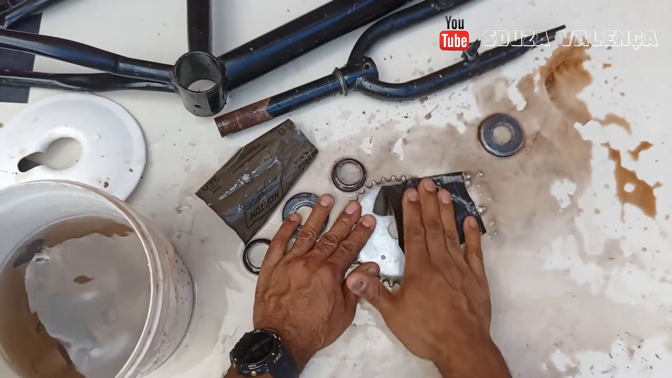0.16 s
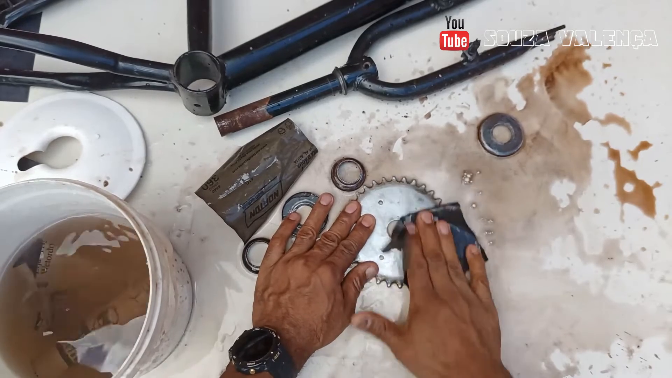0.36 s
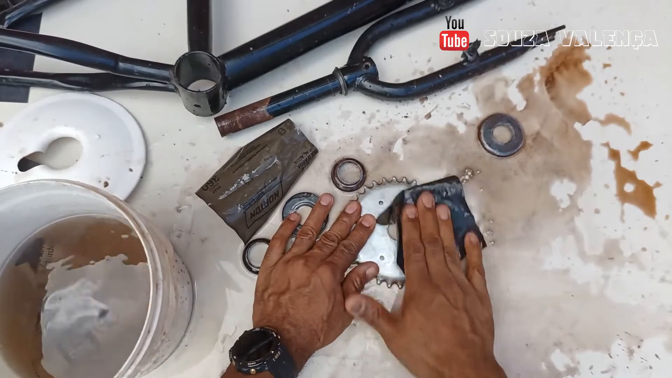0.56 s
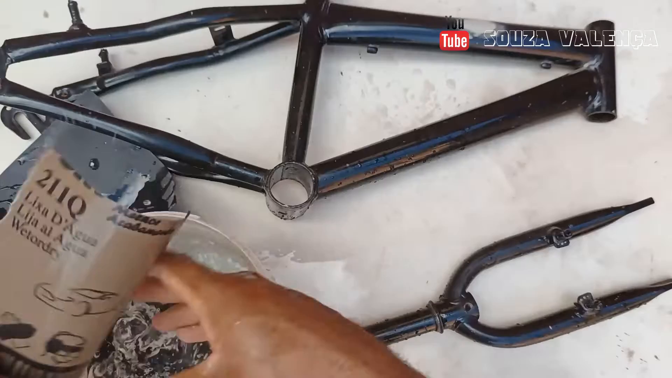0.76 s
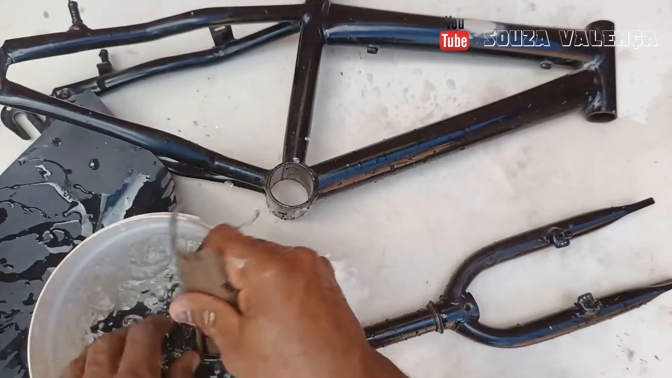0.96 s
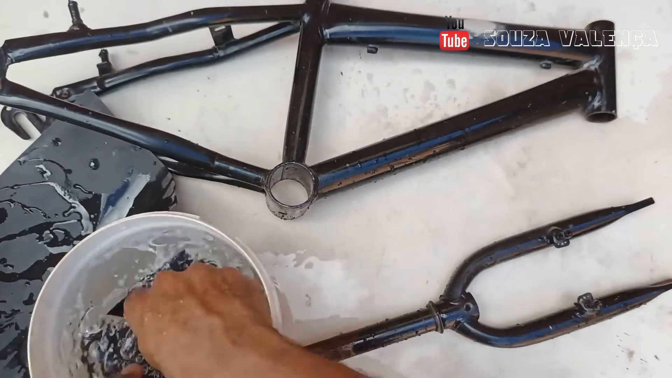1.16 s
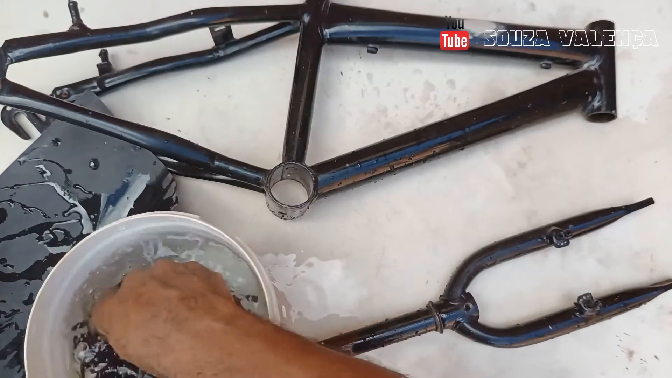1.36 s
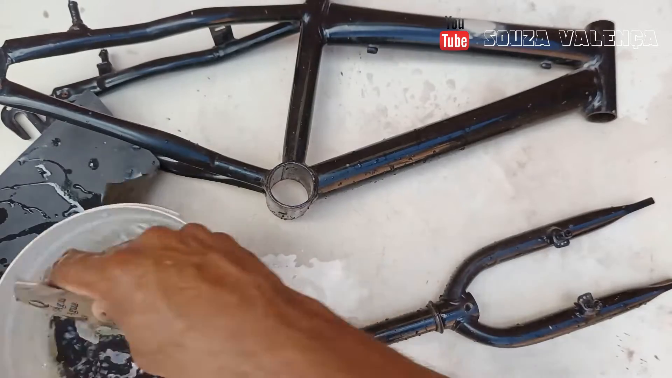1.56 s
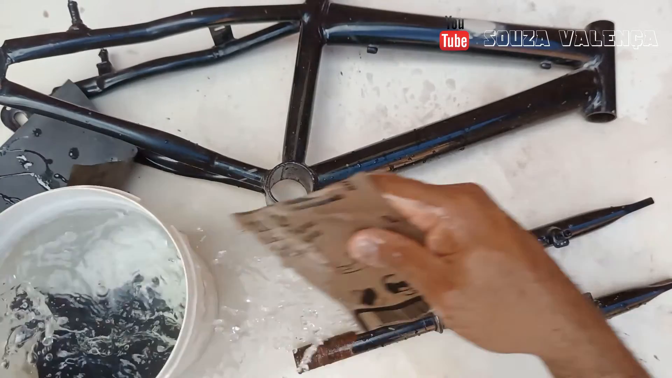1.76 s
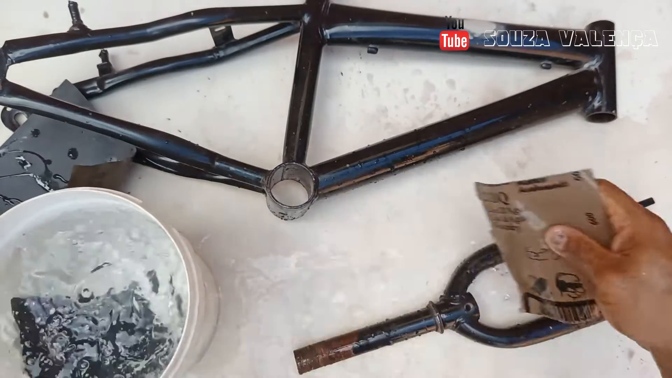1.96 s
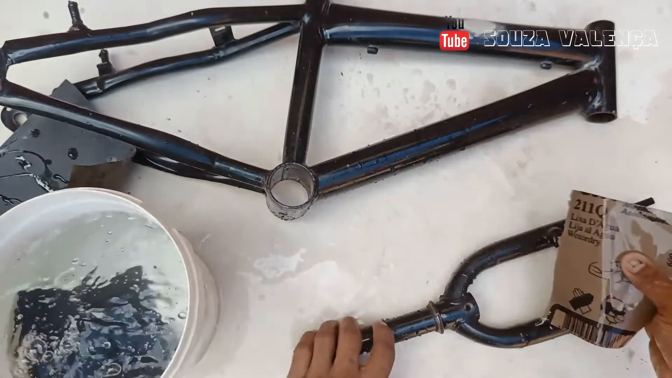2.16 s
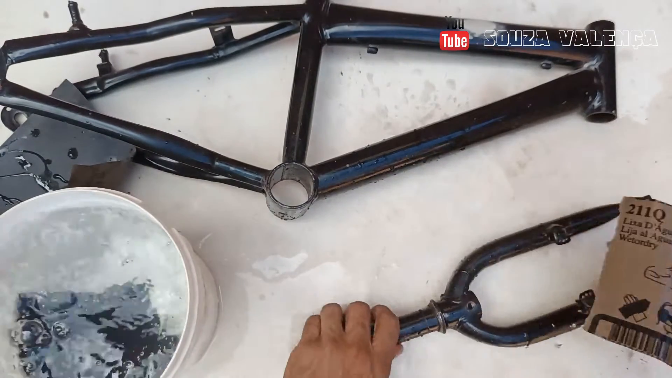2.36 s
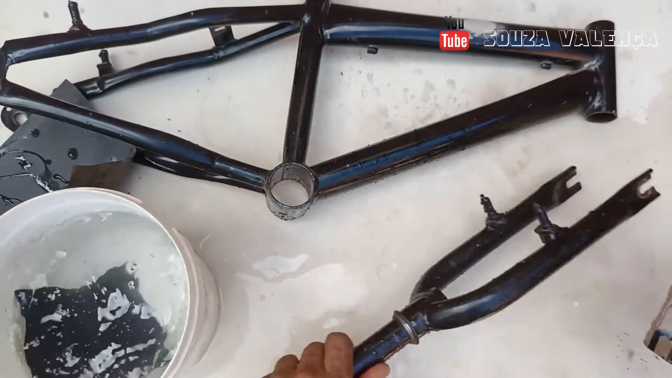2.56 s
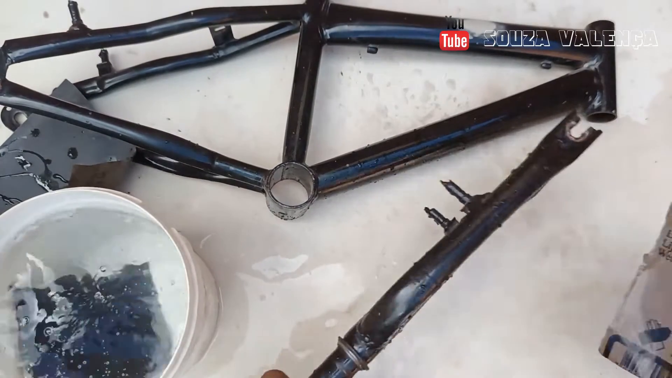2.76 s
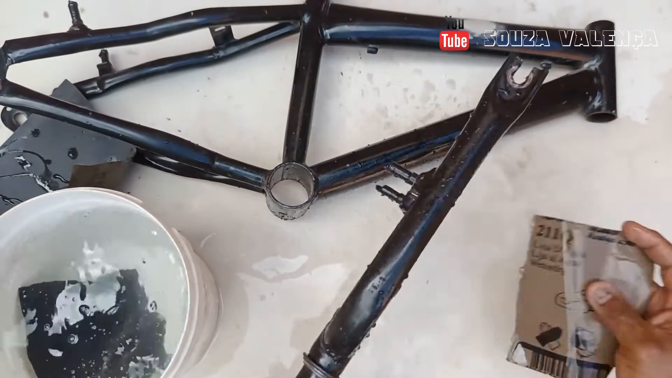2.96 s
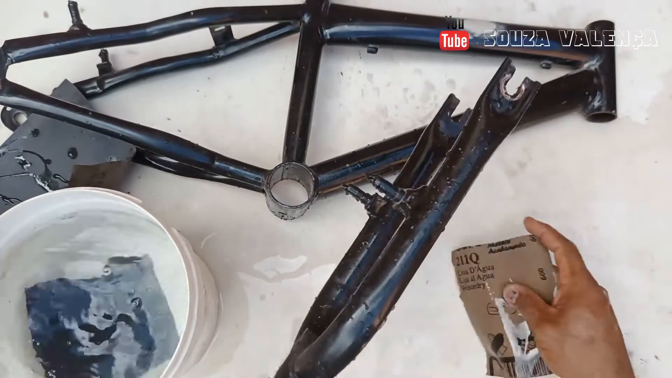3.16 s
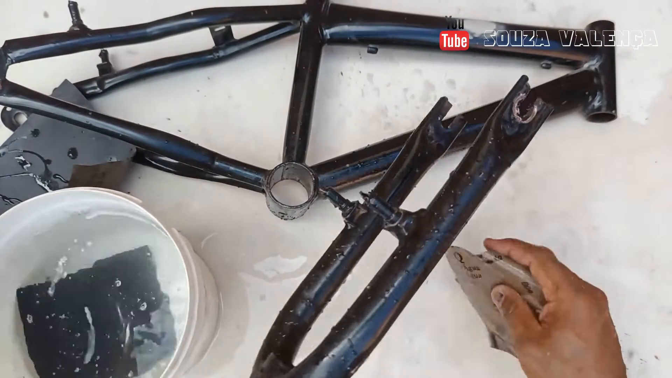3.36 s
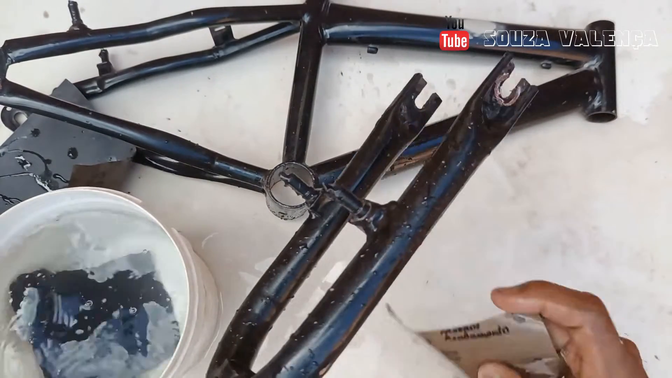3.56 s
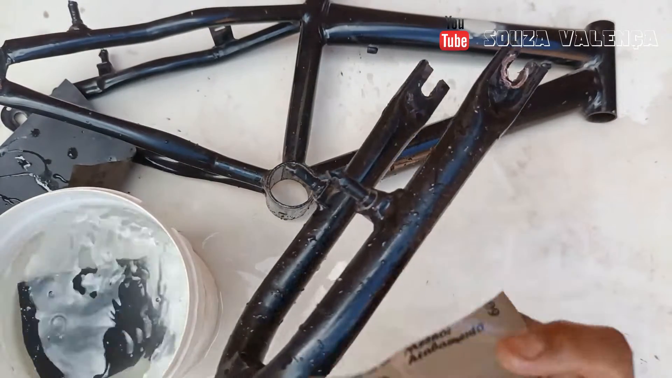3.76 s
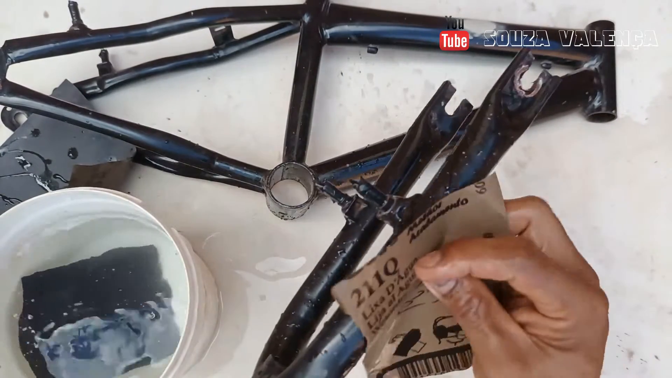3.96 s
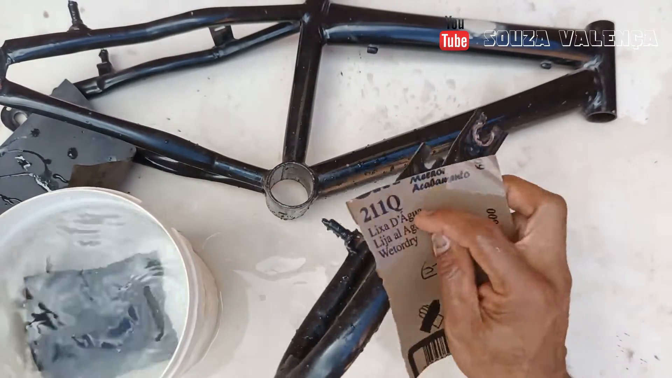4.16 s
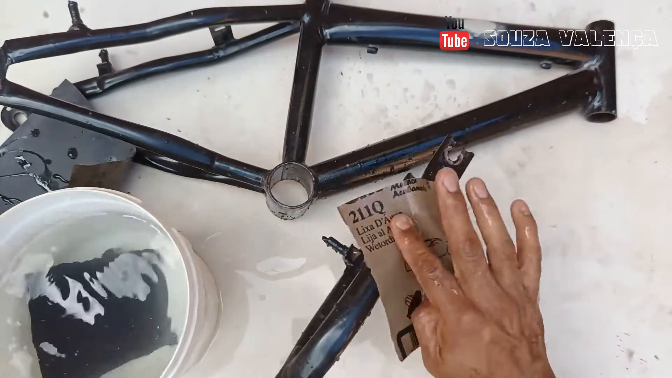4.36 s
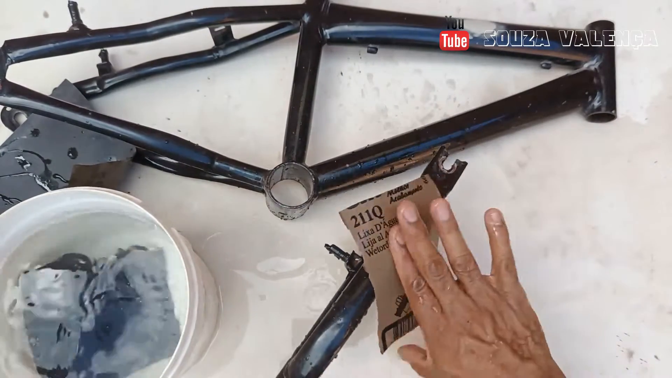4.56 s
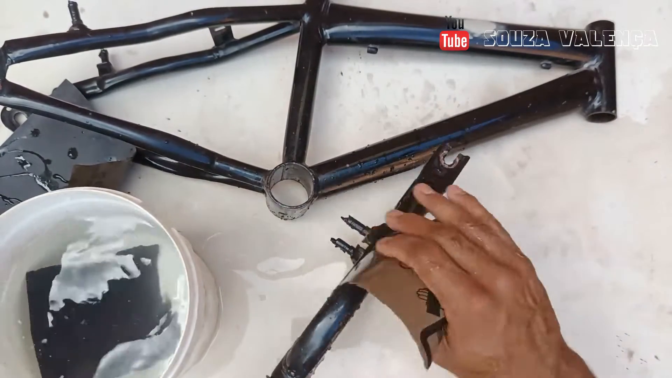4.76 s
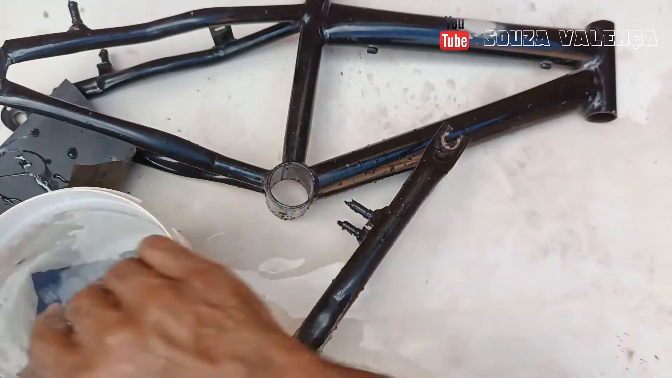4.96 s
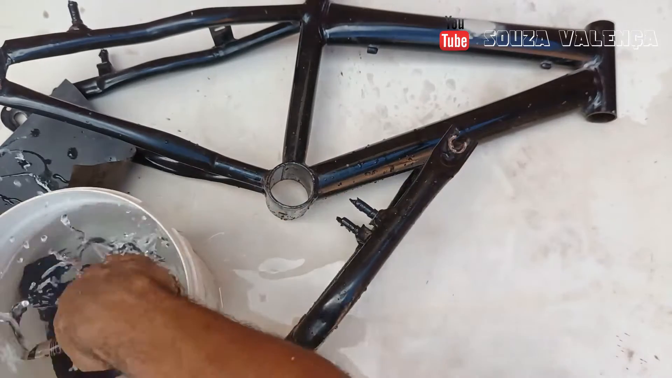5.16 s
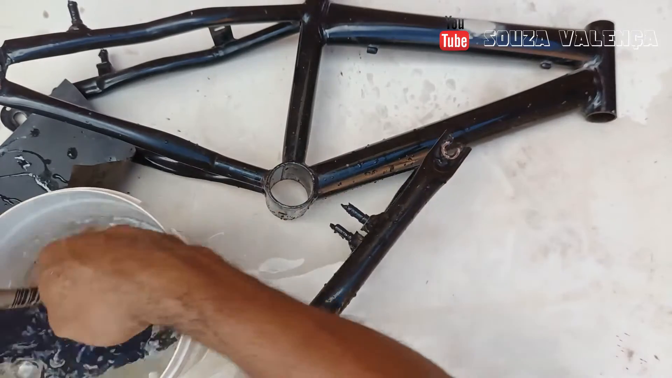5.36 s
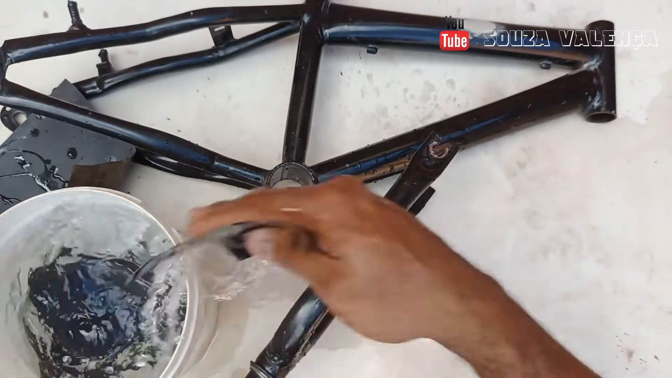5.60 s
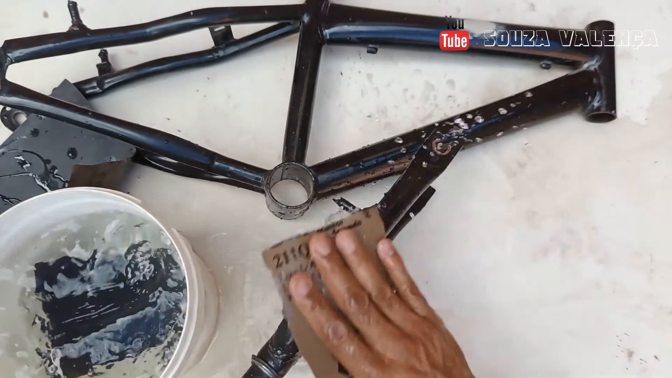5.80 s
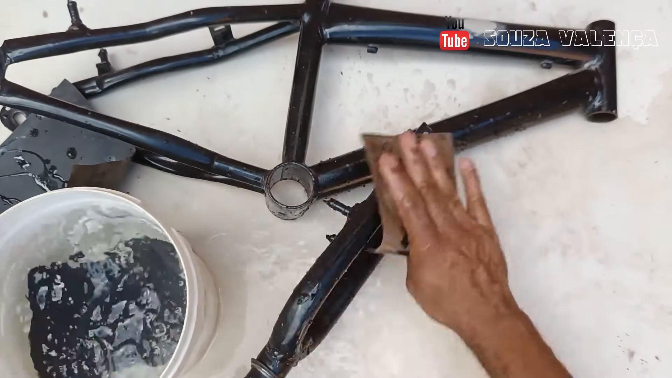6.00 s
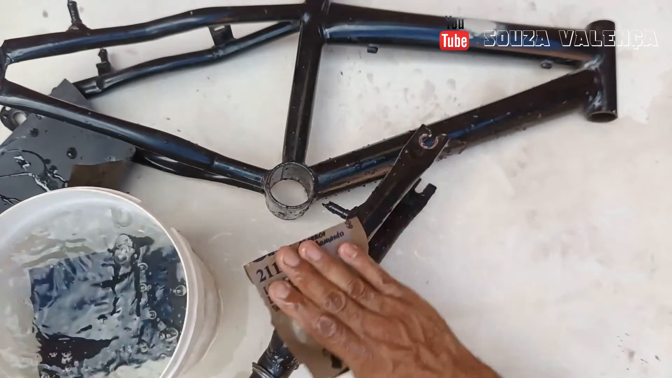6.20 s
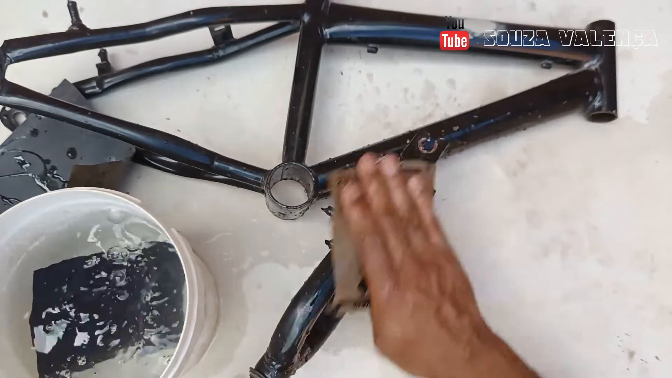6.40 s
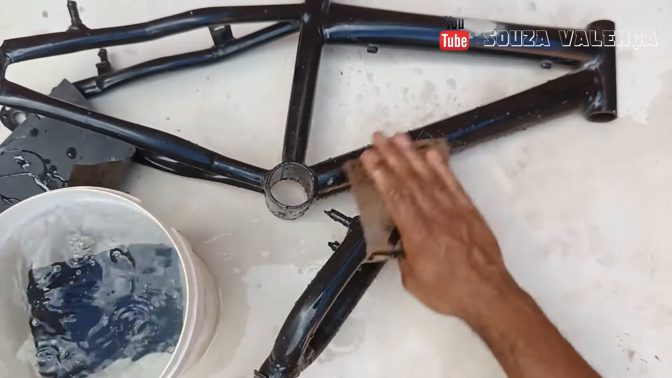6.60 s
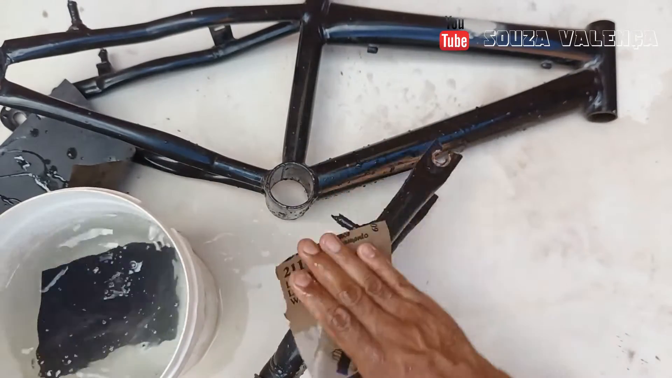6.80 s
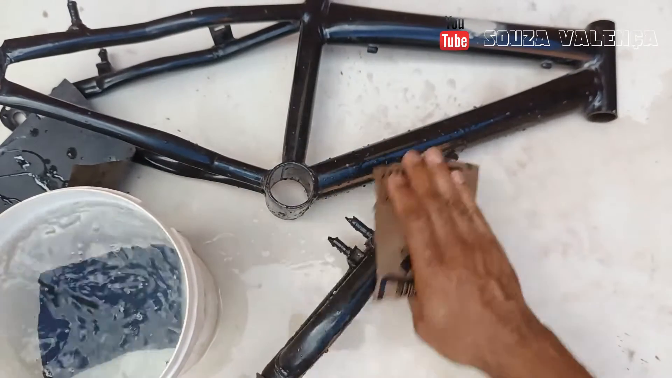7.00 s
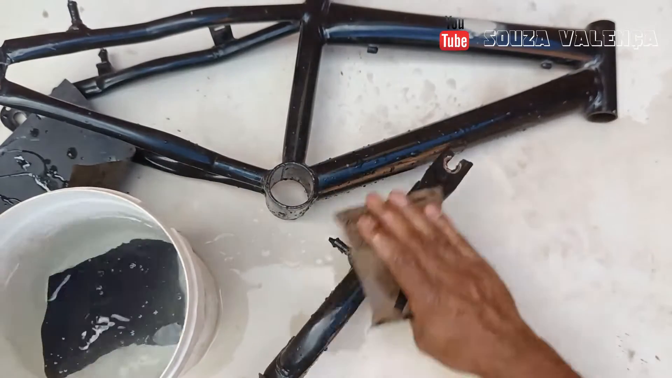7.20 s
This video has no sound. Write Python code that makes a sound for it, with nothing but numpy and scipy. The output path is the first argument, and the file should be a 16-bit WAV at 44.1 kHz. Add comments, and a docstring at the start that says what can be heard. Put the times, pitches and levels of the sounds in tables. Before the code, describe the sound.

Fast gritty rubbing on ringing steel, watery sloshing and bubbling, quiet paper handling with hollow knocks, another dip, then brisk sanding strokes.

```python
"""Wet sandpaper rubs a steel sprocket: grains of grit noise excite resonances of the steel. It is rinsed in a
bucket: swarms of small bubble tones, larger gliding bubbles, noise-burst slaps, ringing wall. Then rustling grains
and snaps as paper and a steel fork are handled, taps on its tube, modal knocks on a hollow table and far whistling
birds. A second dip follows, then strokes along the fork. Faint outdoor noise and table shakes run beneath;
a small, dull microphone is close."""
import sys
import numpy as np
from scipy import signal
from scipy.fft import rfft, irfft, next_fast_len
from scipy.io import wavfile
from scipy.ndimage import uniform_filter1d, map_coordinates

SR = 44100
rng = np.random.default_rng(int(sys.argv[2]) if len(sys.argv) > 2 else 0)


def master_out(mix):
    """Clip the mix to full scale and print it as 16-bit PCM to the path in sys.argv[1]."""
    frames = np.transpose(np.atleast_2d(mix))
    ceiling = np.clip(frames, -1, 1)
    pcm = np.round(ceiling * 32767).astype(np.int16)
    wavfile.write(sys.argv[1], SR, pcm)


N = 319284  # samples

# outdoor background: (frequency [Hz], gain [dB])
AIR_COLOUR = [(20, -7.5), (60, 9.5), (130, 10.5), (300, 5.5), (1000, -2.5), (2000, -8), (4000, -8),
              (7000, -11.5), (12000, 0.5), (16000, -5)]

# strokes of the hand: (start [s], length [s], hardest press [share of length], grit [dB],
# drag of the steel's middle modes [dB], body of the part on the table [dB], bite of the drag [dB])
SPROCKET_STROKES = [(-.1, .16, 0.56, -28.5, -37, -62, -3.5), (.054, 0.17, 0.56, -29.5, -38, -55.5, -0.5),
                    (.23, 0.18, 0.65, -28.5, -32.5, -38.5, 3), (.405, 0.16, .7, -28, -38.5, -54, -1.5),
                    (.57, 0.19, 0.74, -33, -37, -79, 13)]
FORK_STROKES = [(5.79, 0.16, 0.63, -37.5, -47.5, -49.5, 3.1), (5.94, 0.15, 0.31, -33.5, -44, -69, 2.7),
                (6.066, 0.14, 0.58, -32.5, -42.5, -54, 1), (6.185, 0.087, 0.12, -33, -52.5, -93, 0.82),
                (6.265, 0.17, 0.067, -37, -49.5, -61.5, 8.3), (6.418, 0.17, 0.086, -29, -46, -60.5, 11),
                (6.575, 0.17, 0.83, -28.5, -38, -56.5, 1.3), (6.712, 0.18, 0.32, -29.5, -46, -65.5, 1.4),
                (6.885, 0.16, .7, -27.5, -39, -60, 1), (7.02, .19, 0.5, -29.5, -46.5, -61.5, 2.3),
                (7.21, 0.072, 0.34, -50, -38.5, -47.5, 1)]
# steel resonances: (frequency [Hz], width [Hz], level [dB])
SPROCKET_MODES = [(607, 74, -6.5), (1450, 59, 5), (2090, 60, -18), (2480, 110, -12), (3120, 69, 7),
                  (3260, 68, -0.5), (3543, 110, 8.5), (4520, 150, -10.5), (5030, 160, 0), (6400, 120, -7),
                  (6030, 66, -4), (7700, 88, -6)]
FORK_MODES = [(1430, 19, 6.5), (2690, 60, -0.5), (3330, 700, 1.5)]
# colours of grit, drag and body: (frequency [Hz], gain [dB])
GRIT_COLOUR = [(3000, -45.5), (4300, 3), (5500, 10.5), (7000, 8), (9000, 8.5), (13000, 9), (15000, 3.5)]
DRAG_COLOUR = [(1100, -28), (1900, -4.5), (2500, -4), (3200, -5.5), (4000, -6.5), (5500, -23)]
BODY_COLOUR = [(180, -7), (350, 0), (700, 2.5), (1400, -2.5), (2200, -29.5)]
START_S, STOP_S, TURN_DB = 0.018, 0.032, 23.5  # speeding up, slowing down, loss at the turn
SWELL_DB = 6  # gain of the grit from half a stroke length away to the hardest press
DRAG_SWELLS, BODY_SWELLS = 0.53, 1.4  # share of the grit's swell
BITE_HALF_S = 0.03  # reach of the bite on each side of the hardest press

# pushes that shake the table: (peak [s], rise [s], fall [s], level [dB])
TABLE_SHAKES = [(.104, 0.064, .05, -52), (.354, .04, .15, -51), (.65, 0.13, 0.071, -59.5),
                (1.142, .04, 0.16, -52), (1.286, 0.052, 0.083, -52.5), (1.472, 0.042, 0.094, -48),
                (1.68, .1, 0.072, -41.5), (1.894, 0.04, 0.13, -40.5), (2.05, 0.16, 0.035, -47),
                (2.242, 0.027, 0.17, -34), (4.43, 0.019, 0.43, -57), (4.54, 0.01, 0.35, -34.5),
                (4.834, 0.38, 0.11, -40.5), (5.528, .06, 0.084, -52.5), (5.654, 0.028, 0.17, -47),
                (5.82, .05, 0.18, -34), (5.9, 0.11, 0.068, -44), (6.456, 0.2, 0.28, -60),
                (6.76, 0.074, 0.35, -59), (7.03, .03, 0.17, -49.5), (7.13, 0.13, 0.037, -53),
                (7.24, 0.043, .1, -67)]
# colour of the shaking: (frequency [Hz], gain [dB])
SHAKE_COLOUR = [(30, -32), (60, 2), (90, 4.5), (125, 6), (170, -1.5), (300, -48)]
# fork on the table: (time [s], level [dB], clack relative to the knock [dB])
KNOCKS = [(2.221, -45.5, -24), (2.248, -46, -5.5), (4.534, -12.5, -51), (4.579, -25.5, -32),
          (4.608, -18, -5), (4.744, -32, -2), (4.809, -27.5, 7), (5.782, -33.5, -1), (5.815, -26.5, -20),
          (5.839, -36.5, -11)]
# hollow table modes: (frequency [Hz], level [dB], t60 [s])
TABLE_MODES = [(127, 0, 0.3), (327, 0, 0.084), (414.7, -5.5, 0.2), (500, -3.5, 0.093), (629.4, -6, 0.12),
               (1000, -16, 0.22)]

# water stirred and poured in the bucket: (peak [s], rise [s], fall [s], fizz [dB], splash [dB], slosh [dB])
RINSING = [(.78, 0.0029, .06, -79, -46, -45), (.82, 0.019, 0.14, -43.5, -54, -67),
           (.92, .15, 0.011, -44.5, -57, -90), (1.008, 0.091, 0.054, -42, -49, -90),
           (1.09, 0.052, 0.11, -52, -49, -59), (1.115, 0.0095, .07, -62, -48, -38),
           (1.2, .1, 0.084, -57, -61.5, -65), (1.256, 0.06, 0.026, -84, -45.5, -51.5),
           (1.3, 0.027, .1, -50, -43.5, -51), (1.37, 0.0067, 0.048, -39, -72, -48.5),
           (1.424, 0.032, 0.047, -68, -47.5, -43.5), (1.646, 0.13, 0.16, -48, -45, -41),
           (1.724, 0.166, 0.29, -42.5, -48.5, -52), (1.802, 0.146, 0.16, -47, -47.5, -44.5),
           (1.875, 0.037, 0.068, -75, -55, -49), (2.03, .3, 0.085, -63.5, -82.5, -59.5),
           (5.18, 0.025, 0.078, -41, -52, -84), (5.277, .01, 0.03, -52, -45, -31),
           (5.3, 0.0027, 0.054, -34, -38.5, -29), (5.44, 0.23, 0.22, -82, -71, -63.5),
           (5.54, .15, 0.057, -58.5, -71, -90), (5.636, 0.028, .035, -38, -48.5, -63),
           (5.775, 0.16, 0.011, -52.5, -67, -53)]
# colour of the fizz: (frequency [Hz], gain [dB])
FIZZ_COLOUR = [(3000, -41.5), (4300, -5.5), (5500, 10.5), (7000, -7.5), (10000, 4), (15000, 5)]
# air and wall of the bucket: (frequency [Hz], width [Hz], level [dB])
BUCKET_MODES = [(345, 36, -8), (626, 78, -10.5), (807, 18, 2), (3340, 25, -1.5), (4900, 22, -2)]
# large bubbles and drops: (time [s], level [dB], pitch [Hz], t60 [s])
DROPS = [(0.809, -40, 860, 0.058), (0.847, -27.5, 1434, 0.033), (0.893, -41.5, 1670, 0.039),
         (0.913, -27.5, 3580, 0.03), (1.011, -49, 3520, 0.065), (1.114, -21, 705, 0.035),
         (1.185, -40.5, 1620, 0.059), (1.258, -40, 1000, 0.073), (1.41, -27.5, 1336, 0.044),
         (1.637, -23.5, 602, 0.038), (1.754, -25.5, 1000, 0.037), (1.792, -33, 830, 0.14),
         (1.884, -39, 345, 0.15), (1.668, -30, 550, .04), (1.925, -41, 448, 0.1), (2.0, -40.5, 553, .06),
         (2.035, -42.5, 412, 0.082), (1.2, -43.5, 1270, 0.052), (1.285, -38, 1030, 0.049),
         (1.505, -49, 1383, 0.068), (1.53, -42.5, 1495, .05), (5.251, -36, 838, 0.07),
         (5.277, -23.5, 440, 0.026), (5.298, -20, 840, 0.041), (5.332, -42, 793, 0.049),
         (5.438, -46, 1444, 0.07), (5.716, -32, 680, 0.048)]
# deep pockets of air: (time [s], level [dB], pitch [Hz], t60 [s])
GULPS = [(.775, -28.5, 584, 0.087), (1.96, -42, 478, 0.079)]
# knocks on the bucket wall: (time [s], level [dB], pitch [Hz], t60 [s])
BUCKET_RINGS = [(.86, -62, 692, 0.56), (1.116, -48, 750, 0.25), (1.41, -54, 1380, 1),
                (5.186, -42.5, 850, 0.16), (5.3, -54, 814, 0.77), (5.545, -59, 830, 0.22)]
# fine droplets flying off the paper: (peak [s], rise [s], fall [s], level [dB])
SPRAY = [(1.28, 0.0049, .05, -25.5), (1.885, .003, 0.022, -45), (1.925, 0.0034, .02, -48),
         (1.953, .003, .03, -42.5), (1.984, .003, .05, -45)]
# colour of the spray: (frequency [Hz], gain [dB])
MIST_COLOUR = [(7000, -18), (8800, 8), (12500, -9), (14000, -17), (16000, -16)]
FADE_DB = 25  # gain over a surge's rise time, loss over its fall time

# short bursts: (time [s], level [dB], centre [Hz], t60 [s])
WATER_SLAPS = [(0.7741, -30.5, 2570, 0.045), (0.8566, -28, 5100, 0.035), (0.9084, -31.5, 3780, 0.038),
               (1.014, -21, 4050, 0.034), (1.064, -35, 5560, 0.11), (1.1128, -31, 1900, 0.031),
               (1.257, -25.5, 1700, 0.02), (1.271, -15.5, 2360, 0.018), (1.284, -16.5, 5100, 0.026),
               (1.2936, -19.5, 3480, 0.014), (1.312, -19, 2740, 0.046), (1.3678, -24.5, 3900, 0.062),
               (1.402, -33, 2600, 0.04), (1.4094, -23, 5130, 0.05), (1.423, -25, 4000, 0.023),
               (1.437, -29, 3030, 0.034), (1.6207, -29, 3400, 0.037), (1.7345, -27.5, 5820, 0.053),
               (1.7918, -24, 5100, 0.087), (1.953, -33.5, 2800, 0.031), (1.9824, -33.5, 6550, 0.041),
               (2.0637, -36.5, 4820, 0.08), (5.1512, -40.5, 4093, 0.078), (5.1718, -27.5, 5570, 0.034),
               (5.1991, -26, 3670, 0.058), (5.2994, -21.5, 3400, 0.026), (5.333, -27.5, 1600, 0.026),
               (5.4584, -37, 2130, 0.1), (5.5449, -29, 2520, 0.046), (5.6301, -30.5, 2760, 0.082),
               (5.693, -40, 2290, 0.07), (5.716, -28.5, 1530, 0.054)]
PAPER_SNAPS = [(3.186, -42.5, 1760, 0.035), (3.215, -43.5, 4600, 0.08), (3.277, -39, 1200, 0.021),
               (3.294, -27, 3750, 0.034), (3.301, -30, 2410, 0.03), (3.3927, -48.5, 6560, 0.088),
               (3.7314, -50.5, 4960, 0.1), (3.8322, -35.5, 2370, 0.04), (3.8736, -37.5, 2800, 0.075),
               (3.9937, -19.5, 3150, 0.023), (4.3276, -35.5, 2360, 0.087), (4.535, -23, 3400, 0.029),
               (4.7181, -19.5, 6100, 0.023), (4.8404, -28.5, 5100, 0.038), (5.007, -43.5, 3800, 0.1)]
GRIT_CATCHES = [(5.8122, -14, 3660, 0.0097), (5.8434, -17, 2900, 0.069), (6.0716, -12.5, 6570, 0.028),
                (6.121, -20, 5040, 0.046), (6.391, -20, 1400, 0.024), (6.4232, -18, 3200, 0.09),
                (6.764, -30, 3400, 0.018), (6.8044, -28, 5300, 0.079), (6.9022, -12.5, 2720, 0.038),
                (7.222, -20, 2420, 0.035)]
WATER_TREBLE_DB, PAPER_TREBLE_DB, GRIT_TREBLE_DB = -9, -16, -9  # crack above 7.5 kHz

# far whistles: (start [s], length [s], start pitch [Hz], end pitch [Hz], level [dB])
BIRDS = [(2.187, 0.2, 4410, 4520, -68.5), (2.495, 0.058, 5900, 5920, -58.5),
         (2.598, 0.3, 4270, 4070, -80.5), (2.997, 0.27, 5850, 5750, -69.5), (3.616, 0.083, 3040, 3170, -74),
         (4.902, 0.079, 6300, 6130, -72), (4.885, 0.17, 5250, 5300, -74), (5.035, 0.13, 4560, 4450, -70.5)]
# hollow taps of the steel tube, pitched by the grip: (time [s], level [dB], pitch [Hz], t60 [s])
TAPS = [(2.248, -37.5, 515, 0.063), (2.508, -58.5, 702, 0.27), (3.19, -50.5, 540, 0.19),
        (3.277, -35, 1000, 0.025), (3.299, -45, 868, 0.11), (3.993, -31, 419, 0.04),
        (4.327, -36, 1327, 0.053), (4.709, -29, 1110, 0.027), (4.746, -33.5, 550, 0.076),
        (4.808, -21.5, 524, 0.04), (5.841, -23, 608, 0.045), (6.278, -32.5, 579, 0.062),
        (6.392, -21.5, 663, 0.024), (6.424, -31, 1120, 0.031), (6.925, -36.5, 592, 0.074),
        (7.113, -31.5, 630, 0.083)]
# wet paper and fork moved about: (peak [s], rise [s], fall [s], crisp [dB], rustle [dB], body [dB])
HANDLING = [(2.262, .06, 0.093, -60, -70, -56), (2.446, 0.085, 0.18, -62.5, -61.5, -66.5),
            (2.53, .08, 0.068, -80, -72, -52), (3.188, 0.0049, 0.11, -60, -59.5, -50.5),
            (3.303, 0.014, 0.066, -71, -44.5, -47), (3.394, 0.053, .07, -61.5, -79, -94),
            (3.752, 0.019, .05, -67.5, -74, -64), (3.96, 0.036, 0.42, -46.5, -52, -58),
            (3.993, 0.0046, 0.042, -48, -38.5, -31), (4.19, 0.13, 0.027, -78, -69, -79),
            (4.31, 0.032, 0.21, -58, -59, -58.5), (4.51, 0.17, 0.053, -60, -64.5, -49),
            (4.534, 0.0058, 0.095, -83, -37.5, -26.5), (4.609, 0.0043, 0.059, -91, -52, -31.5),
            (4.714, 0.012, .09, -78, -41.5, -37), (4.815, 0.03, 0.066, -42, -44, -37),
            (5.02, 0.22, 0.093, -80, -77, -64.5)]
# colour of the crisp range: (frequency [Hz], gain [dB])
CRISP_COLOUR = [(3000, -33), (4300, -12), (5500, 4), (7000, -1), (10000, 1), (16000, -13)]
# one tap on the lifted fork: (struck [s], level [dB], laid down [s])
TUBE_TAP = (4.422, -31.5, 4.532)
# free fork leg: (frequency [Hz], level [dB], t60 [s])
TUBE_MODES = [(635, -45, 0.14), (918, 5.5, 0.24), (1265, -15, 0.18), (1380, -9, 0.15), (1570, -19, 0.18)]

# microphone response: (frequency [Hz], gain [dB])
MICROPHONE_COLOUR = [(20, -22.5), (55, -5.5), (5000, -2), (6500, -2), (7500, -12.5), (8500, -22.5),
                     (10000, -26), (13500, -27), (14800, -15.5), (16000, -14)]
TOP_HZ = 16000  # nothing passes from here up


def amp(db):
    """Gain of a level in dB."""
    return 10 ** (np.asarray(db) / 20)


def unit(x):
    """x at rms 1."""
    return x / np.sqrt(np.mean(x ** 2) + 1e-20)


def filtered(x, response):
    """x times a response of frequency."""
    m = next_fast_len(len(x) + 8192)
    spectrum = rfft(x, m) * response(np.fft.rfftfreq(m, 1 / SR))
    return irfft(spectrum, m)[:len(x)]


def colour(points):
    """Response read from (frequency [Hz], gain [dB]) points on a log axis."""
    f, db = np.transpose(points)
    return lambda hz: amp(np.interp(np.log(hz + 1), np.log(f), db))


def resonances(modes, ring_db):
    """Response of the direct sound plus resonant modes."""
    def response(f):
        ring = sum(amp(db) * 1j * f * w / (c * c - f * f + 1j * f * w) for c, w, db in modes)
        return 1 + amp(ring_db) * ring
    return response


def wobble(knots_per_s):
    """A smooth random curve through normal knots."""
    knots = rng.standard_normal(int(N * knots_per_s / SR) + 4)
    return map_coordinates(knots, [np.arange(N) * knots_per_s / SR])


def add(track, s, sound):
    """Mix a sound in from time s."""
    part = track[round(s * SR):][:len(sound)]
    part += sound[:len(part)]


def surges(events):
    """A gain per sample for each dB column: events rise and fall linearly in dB."""
    t, out = np.arange(0, N, 16) / SR, 0
    for s, rise, fall, *db in events:
        away = np.maximum((s - t) / max(rise, 1e-3), (t - s) / max(fall, 1e-3))
        out = out + np.outer(amp(db), amp(-FADE_DB * away))
    return [np.interp(np.arange(N) / SR, t, g) for g in out]


def grains(per_s, cycles, spread_db, rise, hiss_db, patchy_db):
    """Many tiny damped tones of scattered pitch and size over hiss, in patches of random gain."""
    draw = rng.random((round(per_s * N / SR), 3))
    k = np.arange(768)
    hz = 300 * 30 ** draw[:, 1:2]
    turns = hz * k / SR
    phase = 2 * np.pi * turns * (1 + rise * turns / cycles)
    tone = np.sin(phase) * np.exp(-turns / cycles) * np.minimum(turns, 1)
    size = amp(-spread_db * np.log(draw[:, 2:] * 0.95 + 0.05)) * hz / 1000
    at = (draw[:, :1] * N).astype(int) + k
    tones = np.bincount(at.ravel(), (size * tone).ravel(), N + len(k))[:N]
    hissing = unit(tones) + amp(hiss_db) * rng.standard_normal(N)
    z = signal.stft(hissing, nperseg=256)[2]
    # patches span neighbouring frequencies, then times
    patches = uniform_filter1d(rng.standard_normal(z.shape), size=2, axis=0)
    patches = uniform_filter1d(patches, size=15, axis=1)
    return signal.istft(z * amp(patchy_db * unit(patches)), nperseg=256)[1][:N]


def rubbing(gains, source, top_colour):
    """One stream of grains heard in three ranges: top, drag and body."""
    colours = (top_colour, DRAG_COLOUR, BODY_COLOUR)
    return sum(g * unit(filtered(source, colour(c))) for g, c in zip(gains, colours))


def ringing(modes, t):
    """One blow on a set of decaying modes, at new random strengths."""
    return sum(amp(db + rng.normal(0, 1.44) - 60 * t / t60) * np.sin(2 * np.pi * hz * t)
               for hz, db, t60 in modes)


def hollow(events, rise, attack_s, lift_db=2.0):
    """A pocket of air or a wall rings at one pitch, which may climb by a share over its t60."""
    out, t = np.zeros(N), np.arange(SR // 2) / SR
    for s, db, hz, t60 in events:
        pitch_hz = hz * (1 + rise * (np.minimum(t / t60, 1) - 0.2))
        phase = 2 * np.pi * np.cumsum(pitch_hz) / SR
        rough = 1 + 0.5 * unit(uniform_filter1d(rng.standard_normal(len(t)), size=250))
        envelope = amp(db + lift_db - 60 * t / t60) * (1 - np.exp(-t / attack_s))
        add(out, s, envelope * np.sin(phase) * rough)
    return out


def air():
    """The quiet outdoor background: coloured noise of slowly wandering level."""
    return amp(-65 + 1.9 * wobble(4)) * unit(filtered(rng.standard_normal(N), colour(AIR_COLOUR)))


def strokes_of_hand(strokes):
    """Gains of grit, drag and body: speed up, press, slow down and turn."""
    t, out = np.arange(0, N, 16) / SR, 0
    for s, length, hardest, grit_db, drag_db, body_db, bite_db in strokes:
        from_press = np.abs(t - (s + hardest * length))
        slow = np.maximum(1 - (t - s) / START_S, 1 - (s + length - t) / STOP_S)
        slow = np.maximum(slow, 0)
        swell = -SWELL_DB * from_press / length * 2
        bite = bite_db * np.clip(2 - 2 * from_press / BITE_HALF_S, 0, 1)
        levels_db = np.array([grit_db + swell,
                              drag_db + DRAG_SWELLS * swell + bite,
                              body_db + BODY_SWELLS * swell + 2 * bite])
        out = out + amp(levels_db - TURN_DB * slow)
    return [np.interp(np.arange(N) / SR, t, g) for g in out]


def sanding(strokes, steel_modes, ring_db):
    """Grit scratches the steel and sets its modes going; the pressure flutters."""
    scratch = grains(per_s=800, cycles=4, spread_db=1.3, rise=0, hiss_db=9, patchy_db=2.6)
    scratch = scratch * amp(1.2 * wobble(45))
    ringing_steel = filtered(scratch, resonances(steel_modes, ring_db))
    return rubbing(strokes_of_hand(strokes), ringing_steel, GRIT_COLOUR)


def table():
    """The hollow table shakes with every push and booms in its modes under blows."""
    out, t = np.zeros(N), np.arange(SR // 2) / SR
    for s, db, clack_db in KNOCKS:
        noise = filtered(rng.standard_normal(len(t)), lambda f: 1 / (1 + f / 900))
        clack = amp(clack_db - 60 * t / 0.04) * unit(noise)
        add(out, s, amp(db - 7.0) * (ringing(TABLE_MODES, t) + clack))
    rumble = unit(filtered(rng.standard_normal(N), colour(SHAKE_COLOUR)))
    return out + surges(TABLE_SHAKES)[0] * rumble


def water():
    """A wash full of small bubbles, and a few large ones; the bucket rings along."""
    swarm = grains(per_s=800, cycles=17, spread_db=2.3, rise=0.008, hiss_db=3, patchy_db=2.3)
    swarm = swarm * amp(1.2 * wobble(50))
    wash = rubbing(surges(RINSING), swarm, FIZZ_COLOUR)
    wash = filtered(wash, resonances(BUCKET_MODES, ring_db=3))
    drops = hollow(DROPS, rise=0.2, attack_s=0.0008)
    gulps = hollow(GULPS, rise=0.95, attack_s=0.015, lift_db=11)
    spray = surges(SPRAY)[0] * unit(filtered(swarm, colour(MIST_COLOUR)))
    wall = hollow(BUCKET_RINGS, rise=0, attack_s=0.003)
    return wash + drops + gulps + spray + wall


def snaps(events, treble_db):
    """Short noise bursts with a ragged spectrum around their own pitch, over a weak broad crack."""
    out, t = np.zeros(N), np.arange(4096) / SR
    for s, db, hz, t60 in events:
        ragged = amp(rng.normal(0, 7.64, 64))

        def band(f):
            peak = np.exp(-0.5 * (np.log2((f + 1) / hz) / 0.24) ** 2)  # width in octaves
            crack = np.where(f < 7500, 0.34 * (f > 900), amp(treble_db))
            return (peak + crack) * np.interp(f, np.arange(64) * 350, ragged)

        burst = unit(filtered(rng.standard_normal(len(t)), band))
        decay = amp(db - 5.5 - 60 * t / t60) + amp(db - 8 - 60 * t / 0.0045)
        add(out, s, decay * (1 - np.exp(-t / 0.0007)) * burst)
    return out


def birds():
    """Far, blurred whistles: gliding sines of unsteady level."""
    out = np.zeros(N)
    for s, length, start_hz, end_hz, db in BIRDS:
        u = np.arange(round(length * SR)) / round(length * SR)
        blur = 1 + 0.93 * unit(uniform_filter1d(rng.standard_normal(len(u)), size=150))
        phase = 2 * np.pi * np.cumsum(start_hz + (end_hz - start_hz) * u) / SR
        add(out, s, amp(db) * np.sqrt(np.sin(np.pi * u)) * blur * np.sin(phase))
    return out


def taps():
    """The hollow steel tube is tapped: short tones at a fixed pitch per tap."""
    return hollow(TAPS, rise=0, attack_s=0.00076)


def handling():
    """Crumpling paper and sliding steel: short dry grains in clumps."""
    rustle = grains(per_s=600, cycles=4, spread_db=1.8, rise=0, hiss_db=7, patchy_db=2.4)
    return rubbing(surges(HANDLING), rustle * amp(1.4 * wobble(60)), CRISP_COLOUR)


def tube():
    """A tap rings the modes of the lifted fork until it is laid down."""
    out, t = np.zeros(N), np.arange(SR // 4) / SR
    s, db, down = TUBE_TAP
    held = np.clip((down - s - t) / 0.004, 0, 1)
    add(out, s, amp(db) * ringing(TUBE_MODES, t) * (1 - np.exp(-t / 0.0014)) * held)
    return out


def walls(x):
    """A short answer of the surroundings: x convolved with decaying noise."""
    t = np.arange(SR // 4) / SR
    tail = rng.standard_normal(len(t)) * amp(-60 * t / 0.094) * (t > 0.003)
    return signal.fftconvolve(x, tail / np.linalg.norm(tail))[:N]


def scene():
    """Near sources with their weak reflections, far birds and air."""
    near = sanding(SPROCKET_STROKES, SPROCKET_MODES, ring_db=6)
    near = near + sanding(FORK_STROKES, FORK_MODES, ring_db=1)
    near = near + water() + handling() + taps() + table() + tube()
    near = near + snaps(WATER_SLAPS, WATER_TREBLE_DB)
    near = near + snaps(PAPER_SNAPS, PAPER_TREBLE_DB)
    near = near + snaps(GRIT_CATCHES, GRIT_TREBLE_DB)
    return (near + amp(-13.5) * walls(near) + birds() + air())[None]


def record(dry):
    """The microphone is dull above 7 kHz, with a port resonance near the top of its band."""
    heard = filtered(dry[0], colour(MICROPHONE_COLOUR))
    return filtered(heard, lambda hz: hz < TOP_HZ)[None]


dry = scene()
out = record(dry)
master_out(out)
```